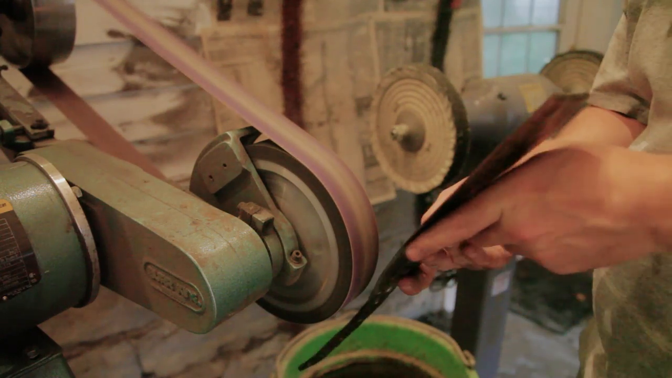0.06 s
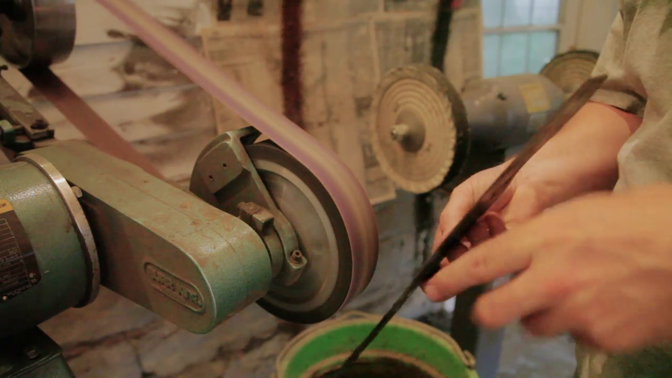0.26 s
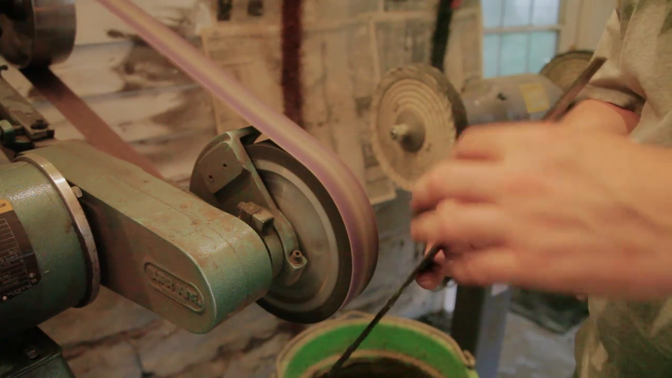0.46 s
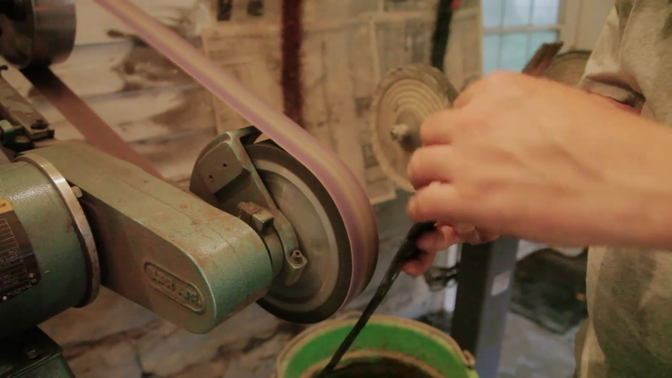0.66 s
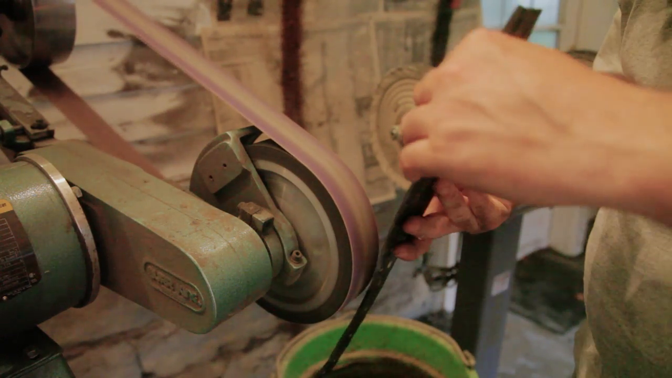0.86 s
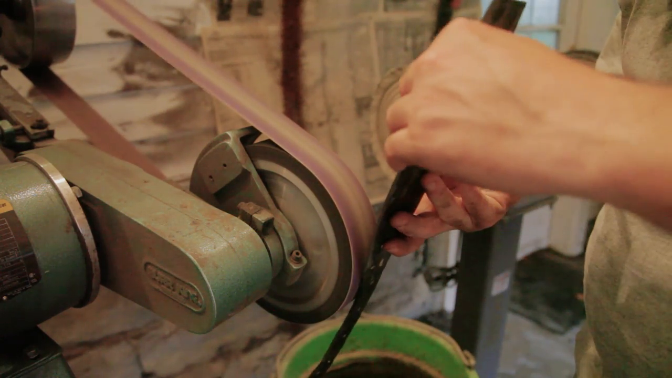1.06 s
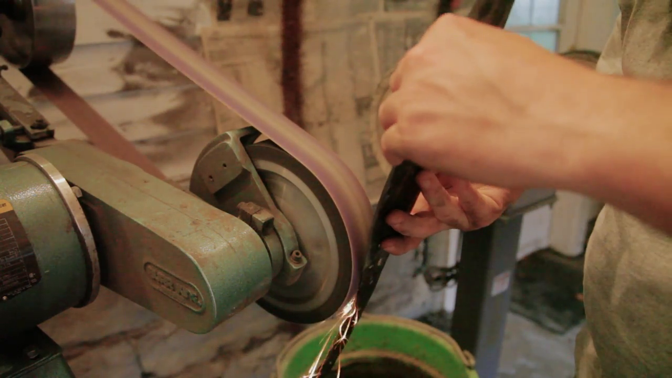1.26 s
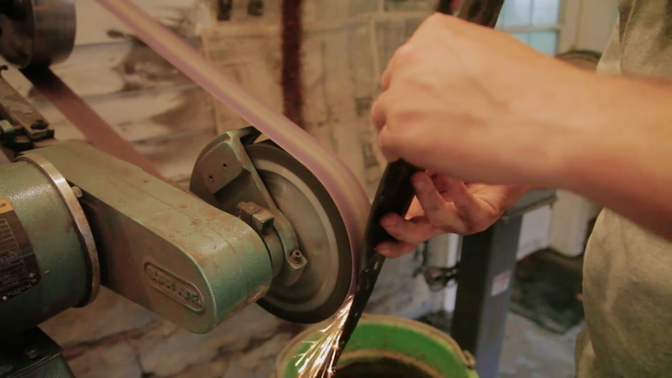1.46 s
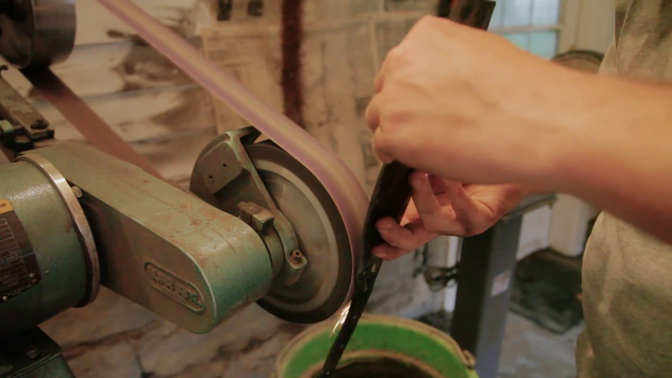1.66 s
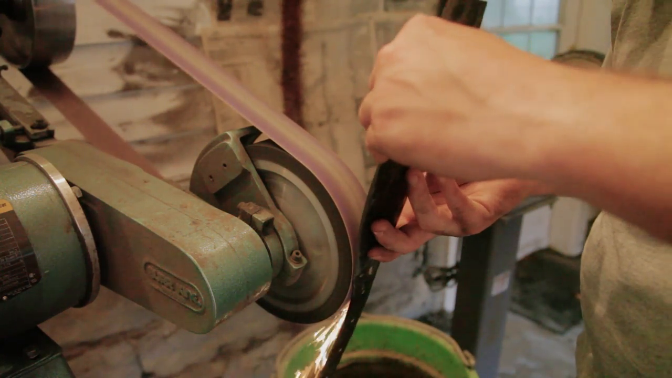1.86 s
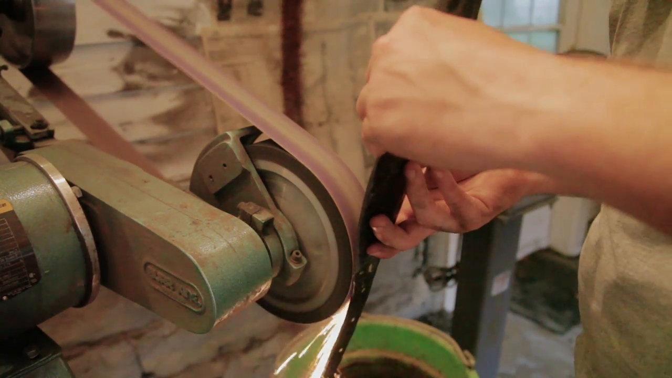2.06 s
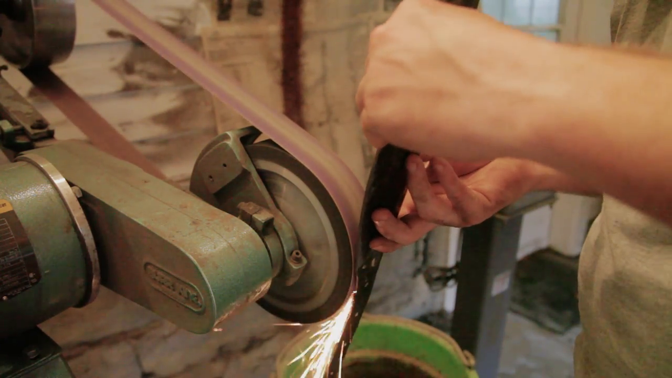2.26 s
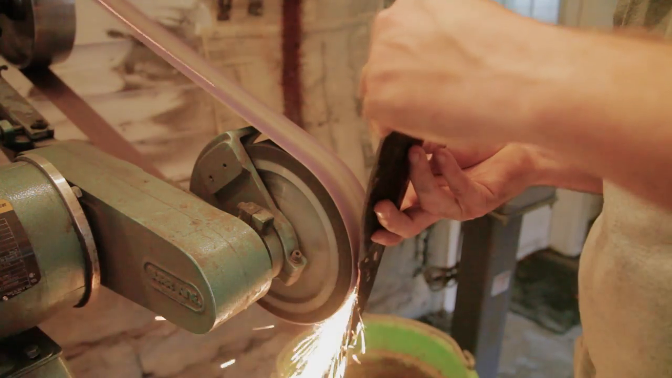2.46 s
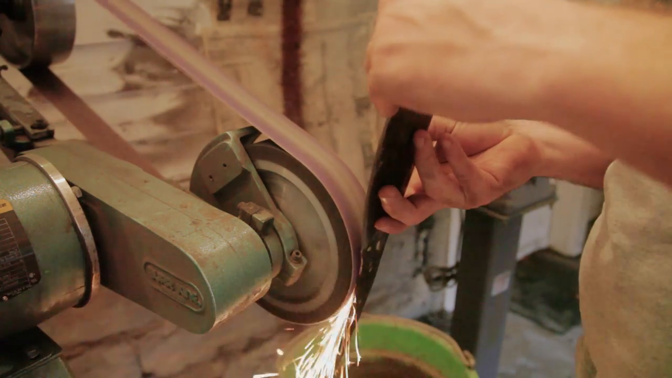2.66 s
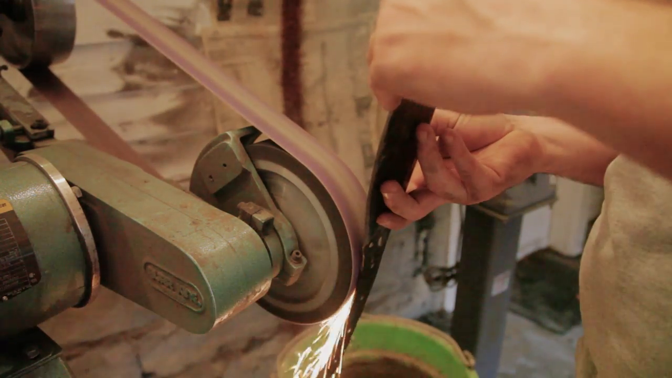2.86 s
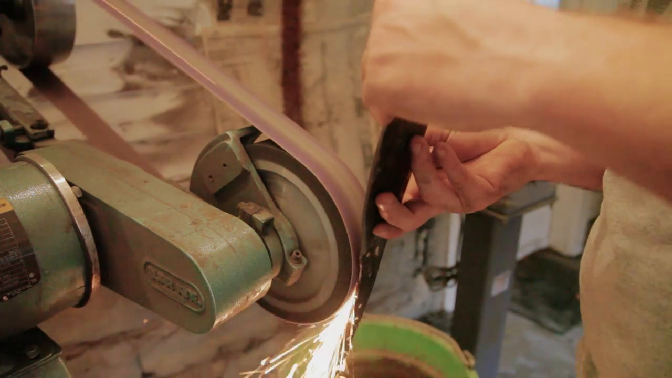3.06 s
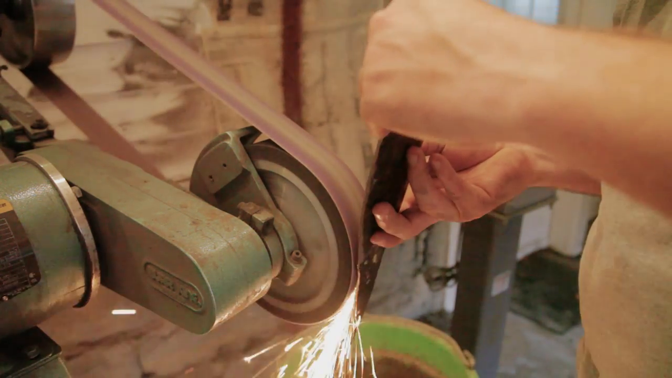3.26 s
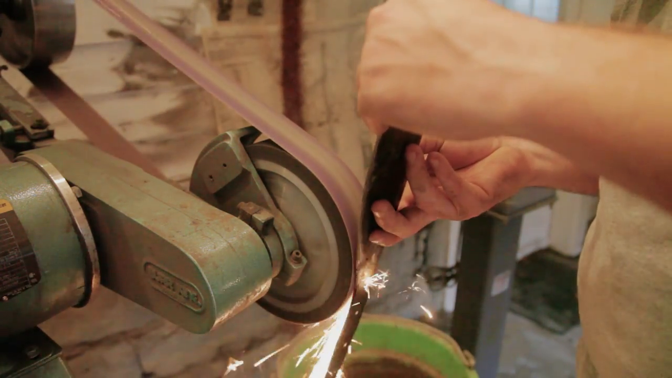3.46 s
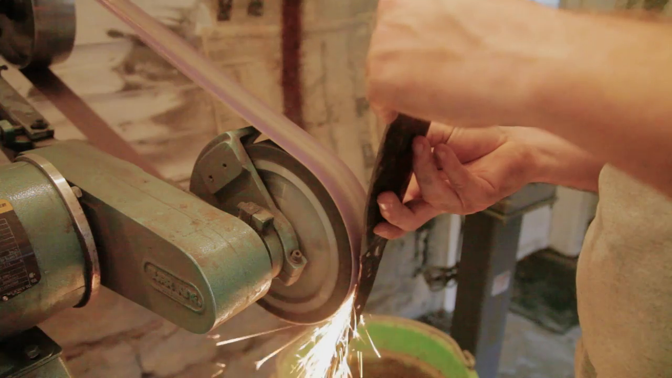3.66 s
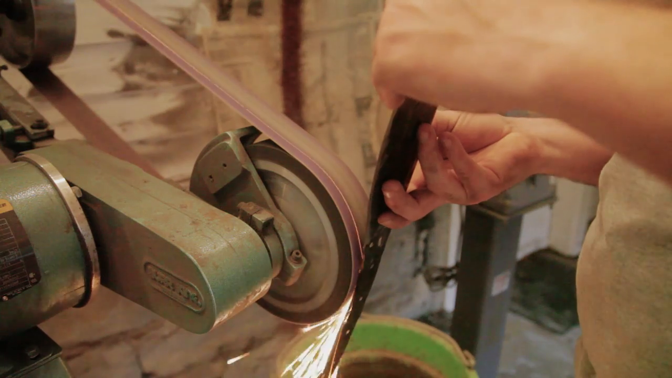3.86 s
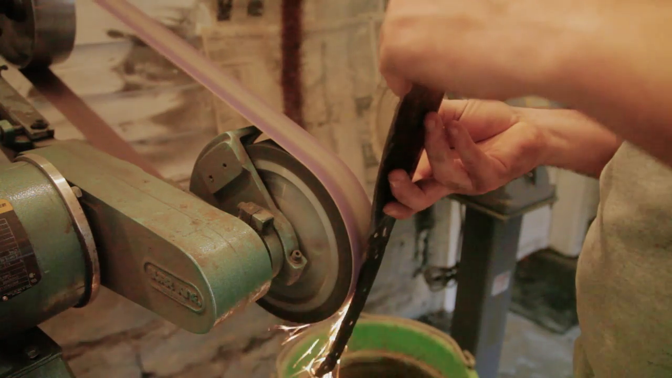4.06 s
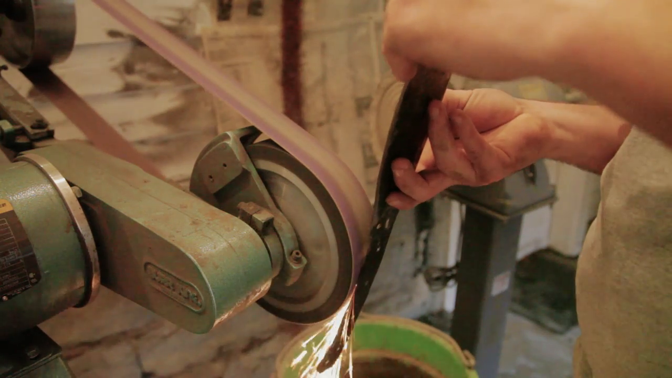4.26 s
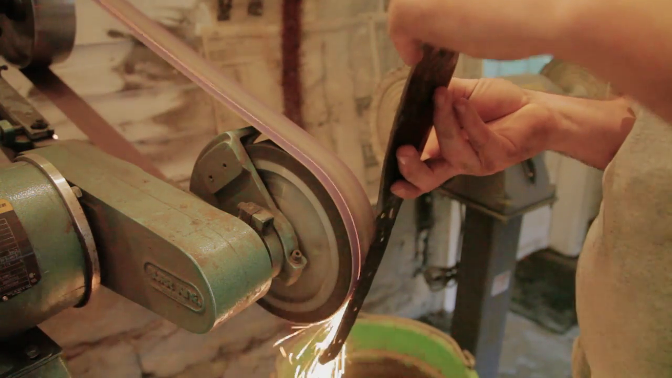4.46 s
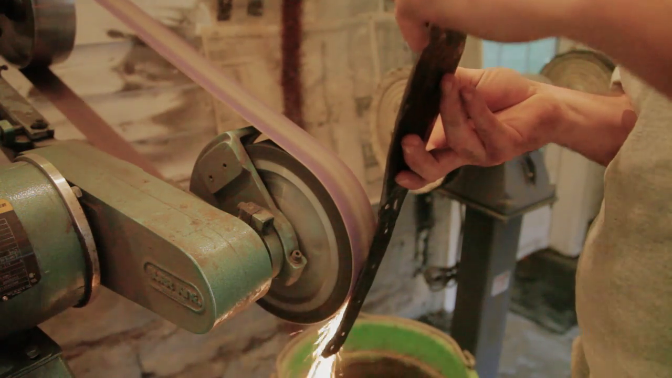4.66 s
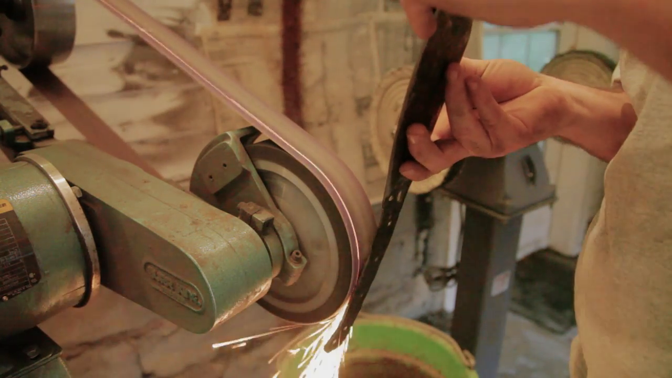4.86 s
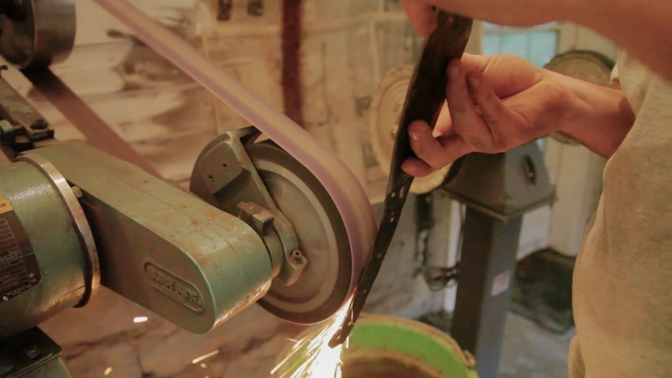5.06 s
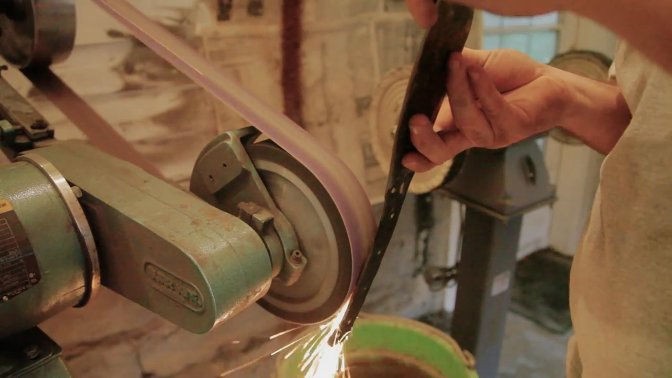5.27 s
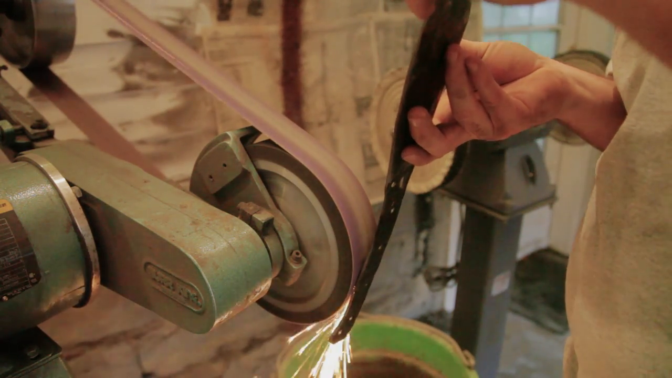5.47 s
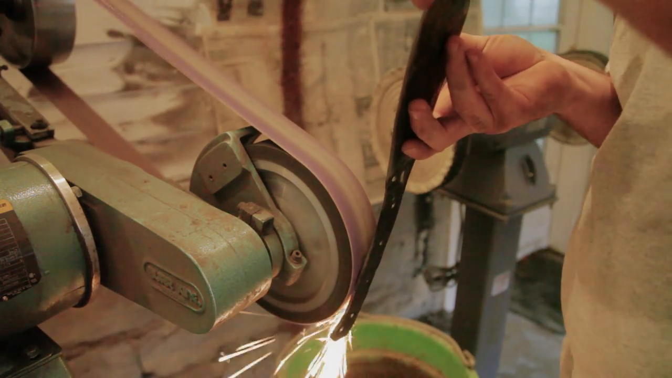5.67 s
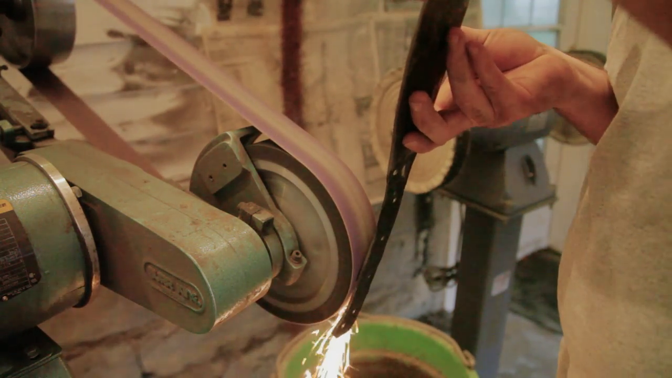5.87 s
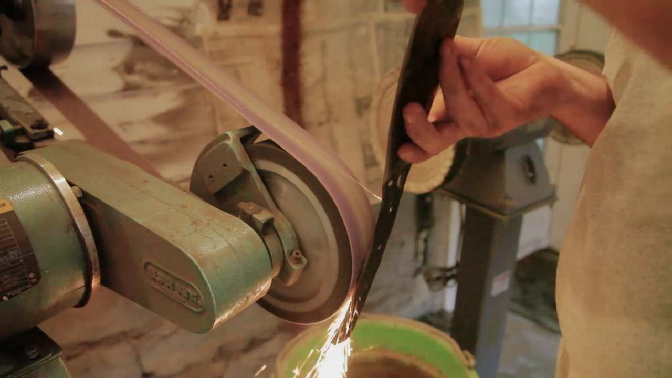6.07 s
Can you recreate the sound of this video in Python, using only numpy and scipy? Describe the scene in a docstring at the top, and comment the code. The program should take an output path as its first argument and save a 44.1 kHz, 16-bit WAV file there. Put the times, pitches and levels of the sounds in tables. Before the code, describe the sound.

A belt grinder runs in a small workshop, its motor humming, its wheel droning and its belt hissing with a fast, even ticking. After about a second a steel blade grazes the belt, chatters briefly and settles into steady grinding. The high scrape carries shifting metallic ringing tones and swells of sizzle, with a coarser rasp whenever the blade is pressed harder. The sound is close, with little echo.

```python
"""In a small workshop, a long steel blade is ground on a running belt grinder.
The blade grazes the belt, lands, bounces ever faster, settles and is drawn along towards its tip.
The grit scrapes the steel, tears off sizzling chips and makes the blade ring with tones that come
and go as the contact point moves; firm presses add a rasp. Behind it the belt hisses, its joint
ticks once a lap, the wheel drones and the motor hums."""
import sys
import numpy as np
from scipy import signal
from scipy.fft import rfft, irfft
from scipy.io import wavfile

SR = 44100
rng = np.random.default_rng(int(sys.argv[2]) if len(sys.argv) > 2 else 0)


def wav_out(sig):
    """Save sig, one row per channel (or a flat mono array), as 16-bit PCM at SR to the path in sys.argv[1]."""
    wavfile.write(sys.argv[1], SR, np.round(np.clip(np.atleast_2d(sig).T, -1, 1) * 32767).astype(np.int16))


N = 270288

# The blade's ways of bending, one tone each. An antinode is a spot that bends most.
# (pitch [Hz], width [Hz], level [dB], swing up and down [dB], lobes along the blade, antinode [0-1])
BLADE_TONES = [(1937, 29, -22.5, 6, 3.54, 0.51), (2036, 29, -20.5, 11.5, 0.75, 0.89),
               (2407, 25, -18, 6.5, 2.6, 0.52), (2575, 22, -19, 4, 1.9, 0.56),
               (2804, 7.4, -24, 4, 4.9, 0.53), (2940, 22, -22.5, 12, 2.15, 0.36),
               (3196, 30, -21, 5.5, 8.1, 0.59), (3544, 21, -14.5, 11.5, 1.36, 0.2),
               (3833, 18, -9, 4.5, 1.02, 0.92), (3918, 92, -16.5, 7, 3.96, 0.64),
               (4164, 27, -12.5, 6, 4.45, 0.53), (4512, 30, -10.5, 4.5, 8.34, 0.535),
               (4676, 35, -13.5, 1, 4.61, 0.6), (5084, 23, -15, 4, 8.6, 0.5),
               (5435, 38, -11.5, 6, 8.02, 0.6), (5830, 13, -13.5, 8.5, 3.57, 0.5),
               (6170, 28, -15.5, 7, 6.9, 0.54), (6563, 110, -11.5, 8, 3.69, 0.5),
               (7050, 67, -20, 12.5, 4.24, 0.65), (7505, 45, -21, 7, 6.0, 0.585),
               (7930, 49.0, -21, 12, 5, 0.54), (8460, 40, -17, 8.5, 12.02, 0.7),
               (8960, 90, -17.5, 6.5, 6, 0.52), (9350, 340, -17, 9.5, 6.2, 0.53),
               (9430, 120, -18, 7.5, 6.9, 0.49), (9900, 87, -24, 12, 5.7, 0.47),
               (10610, 240, -17, 5.8, 5.96, 0.62), (11350, 48.0, -21, 7, 6.5, 0.57),
               (12050, 130, -15.5, 11.5, 3.37, 0.51), (12600, 320, -16, 10, 6.6, 0.54)]
# Where the belt meets the blade, twice to and fro, then tipwards: (time [s], place [0 tip, 1 heel])
CONTACT_PLACE = [(1.3, .665), (1.55, .672), (1.9, .706), (2.18, .692), (2.33, .66), (2.52, .654),
                 (2.7, .596), (2.87, .576), (3.15, .66), (3.52, .68), (3.75, .611), (3.92, .576),
                 (4.13, .572), (4.22, .464), (4.55, .436), (4.65, .317), (5.3, .29), (5.6, .266)]
def blade_ring(push, ring_db):
    """The grit rings each tone of the blade most when the belt meets one of its antinodes."""
    place, = in_time(CONTACT_PLACE)
    settled, = in_time(SETTLED)
    ring = 0
    for hz, width, db, swing_db, lobes, antinode in BLADE_TONES:
        place_db = swing_db * np.cos(2 * np.pi * lobes * (place - antinode))
        knock_db = 4.1 * (1 - settled) * np.log2(4800 / hz)   # bounces favour the low tones
        strength = push * from_db(ring_db + db + place_db + knock_db)
        ring = ring + resonance(strength * grit(spread_db=3), hz, width)
    return from_db(0.04) * ring


# Tone colour of grit scraping the steel: (pitch [Hz], relative level [dB])
SCRAPE_COLOUR = [(3000, -35), (3600, -11), (4300, -11), (5000, -20), (6000, -6), (7200, -4), (8200, -11),
                 (9400, -19), (10400, -34), (12000, -10), (15500, -12.5)]
# Tone colour of chips tearing off: (pitch [Hz], relative level [dB])
SIZZLE_COLOUR = [(8000, -42), (9500, -13), (10300, -4.5), (11400, 0), (12500, -1), (13400, -6),
                 (14400, 1.5), (15700, -5.5)]
def blade(laps):
    """Steel on the moving belt rings, scrapes and sizzles."""
    ring_db, scrape_db, sizzle_db = grinding_levels()
    wobble_db = 0.15 * np.sin(6 * np.pi * laps)   # the slightly uneven wheel turns three times a lap
    flicker_db = 1.02 * drift(35)
    push, bite = contact() * from_db(wobble_db + flicker_db)
    ring = blade_ring(push, ring_db)
    scrape = from_db(scrape_db) * coloured(grit(spread_db=3.5), SCRAPE_COLOUR)
    sizzle = from_db(sizzle_db + 0.9) * coloured(grit(spread_db=6.5), SIZZLE_COLOUR)
    return ring + push * scrape + bite * sizzle


def grit(spread_db):
    """Countless grains bite the steel, each with a strength of its own."""
    return rms_one(rng.standard_normal(N) * from_db(spread_db * rng.standard_normal(N)))


GRAZE_S, LANDING_S, TOUCH_S = 1.177, 1.267, .011   # glancing touch, landing, length of one touch
FIRST_GAP_S, GAP_RATIO = .0328, .966   # each gap between bounces is shorter than the last
# How steadily the blade lies on the belt: (time [s], steady contact [0-1])
SETTLED = [(1.27, 0.6), (1.3, 0.16), (1.52, 0), (1.62, 0.86), (1.7, 1), (1.77, 0.98)]
def contact():
    """Push on the blade and bite of the grit: brief touches that fade as the blade settles."""
    t = np.arange(N) / SR
    settled, = in_time(SETTLED)
    bounces = LANDING_S + np.cumsum(FIRST_GAP_S * GAP_RATIO ** np.arange(16))
    # (time [s], push [dB], bite [dB])
    touches = [(GRAZE_S, 11, 26), (LANDING_S, 11, 12)] + [(s, 6, 12) for s in bounces]
    force = settled * (t > LANDING_S)
    for start, push_db, bite_db in touches:
        age = np.clip((t - start) / TOUCH_S, 0, 10)
        pulse = (1 - np.exp(-10 * age)) * np.exp(-age ** 2)
        force = force + (1 - settled) * from_db([[push_db], [bite_db]]) * pulse
    return force


# Base levels of light grinding: (time [s], ring [dB], scrape [dB], sizzle [dB])
LIGHT_GRINDING = [(1.3, -21.5, -38, -41.5), (1.54, -23.5, -37, -36), (1.7, -24, -32, -29),
                  (2.5, -23.5, -32, -31), (2.86, -24.5, -38, -30.5), (3.0, -24, -30, -31.5),
                  (3.45, -27, -28.5, -29), (3.85, -24.5, -31.5, -31.5), (4.15, -27, -34, -30.5),
                  (4.42, -23, -41, -31.5), (4.56, -28.5, -40, -34), (4.72, -28.5, -43, -37),
                  (4.9, -24.5, -48, -34), (5.42, -26.5, -48, -34.5), (5.65, -26, -50, -30.5),
                  (6.13, -27.5, -51, -31)]
# The hands press harder and the edge digs in: (start [s], end [s], extra ring [dB], rasp [dB])
HAND_PRESSES = [(1.407, 1.624, 3.5, -33), (2.24, 2.726, 3.5, -32), (2.93, 3.285, 4, -30),
                (3.275, 3.857, 1.5, -30), (4.44, 4.508, 4, -32), (5.02, 5.3, 1.5, -38),
                (5.61, 6.203, 2.5, -49)]
# Showers of sparks swell and fade: (peak time [s], half length [s], extra sizzle [dB])
SPARK_SHOWERS = [(1.682, 0.12, 6.5), (2.123, .13, 7.5), (2.585, .04, 8.5), (3.05, .09, 6),
                 (3.547, .09, 4.5), (4.055, 0.098, 8), (4.48, .05, 6.5)]
def grinding_levels():
    """Presses make the ring and scrape louder; showers of sparks lift the sizzle."""
    t = np.arange(N) / SR
    ring_db, scrape_db, sizzle_db = in_time(LIGHT_GRINDING)
    press_db = sum(db * press(start, end) for start, end, db, _ in HAND_PRESSES)
    spark_db = sum(db * np.exp(-((t - s) / half_s) ** 2) for s, half_s, db in SPARK_SHOWERS)
    return ring_db + press_db, scrape_db + 0.81 * press_db, sizzle_db + spark_db


def press(start, end, attack_s=.016, release_s=.03):
    """One press bites in quickly, holds and lets go, on a scale of 0 to 1."""
    t = np.arange(N) / SR
    return np.clip(np.minimum((t - start) / attack_s, (end - t) / release_s) + .5, 0, 1)


# Broad tones of the blade held hard against the wheel: (pitch [Hz], width [Hz], level [dB])
RASP_BANDS = [(3920, 290, -4.5), (4400, 250, -2.5)]
def rasp():
    """Firm presses add a coarse rasp: the blurred ringing of steel damped by the wheel."""
    grip = sum(from_db(db) * press(start, end) for start, end, _, db in HAND_PRESSES)
    coarse = 0
    for hz, width, db in RASP_BANDS:
        band = resonance(grit(spread_db=4.5), hz, width)
        coarse = coarse + from_db(db) * rms_one(resonance(band, hz, width * 2))
    push, _ = contact()
    return grip * push * coarse


# Tone colour of the running belt: (pitch [Hz], relative level [dB])
BELT_COLOUR = [(240, -31), (400, -15.5), (519, -16.5), (560, -9), (860, -13.5), (1190, -5), (1960, -14),
               (2470, -6), (3210, -6), (3510, -1.5), (5000, 0.5), (7210, -7.5), (8930, -6), (9790, -14.5),
               (15500, -23.5)]
# Faint whine of the pulleys: (pitch [Hz], relative level [dB])
PULLEY_WHINE = [(565, -19.5), (737.5, -23), (995.9, -17), (1179, -14), (1497, -15.5)]
# Volume of the belt and pulleys, lower during grinding: (time [s], gain [dB])
BELT_VOLUME = [(0, -32.5), (.35, -31.5), (1.12, -33), (1.23, -36), (1.42, -36.5), (1.62, -39.5), (2.0, -37),
               (2.3, -38.5), (2.47, -36.5), (2.63, -40.5), (2.84, -35.5), (3.18, -39.5), (4.05, -38),
               (4.13, -40), (4.33, -38), (4.55, -39.5), (5.05, -37.5), (6.13, -35)]
def belt(laps):
    """The belt rushes and ticks over whining pulleys, and hisses less once the blade lies on it."""
    volume_db, = in_time(BELT_VOLUME)
    settled, = in_time(SETTLED)
    rush = from_db(12.5) * coloured(belt_surface(laps, repeat_share=0.52), BELT_COLOUR)
    running = rush + from_db(31.5) * joint_ticks(laps)
    hiss = signal.sosfiltfilt(signal.butter(2, 2100, "high", fs=SR, output="sos"), running)
    running = running + hiss * (from_db(-3 * settled) - 1)
    return from_db(volume_db) * (running + tones(PULLEY_WHINE, waver=2.44))


def joint_ticks(laps, rattle_s=0.0013, rattle_db=-16):
    """Once a lap the belt's joint slaps the wheel: a sharp click and a short rattle."""
    clicks = np.diff(np.floor(laps), prepend=-1) * from_db(1.3 * rng.standard_normal(N))
    t = np.arange(SR // 50) / SR
    slap = from_db(rattle_db) * rng.standard_normal(len(t)) * np.exp(-t / rattle_s)
    slap[0] = 1
    slaps = signal.fftconvolve(clicks, slap)[:N]
    return resonance(resonance(slaps, hz=5200, width=5000), hz=6000, width=5500)


# The belt slows a little under load: (time [s], speed [laps per second])
BELT_SPEED = [(0, 11.56), (1.25, 11.56), (2.5, 11.44), (4.2, 11.46), (4.8, 11.51), (6.13, 11.54)]
def belt_laps(first_tick_s=.0074):
    """Count the laps the belt has run; its speed wavers very slightly."""
    speed, = in_time(BELT_SPEED)
    return np.cumsum(speed * (1 + .0005 * drift(5))) / SR - first_tick_s * speed[0]


def belt_surface(laps, repeat_share):
    """The same grit comes round every lap, mixed with fresh noise."""
    one_lap = rng.standard_normal(round(SR / BELT_SPEED[0][1]))
    repeating = one_lap[(laps % 1 * len(one_lap)).astype(int) % len(one_lap)]
    return np.sqrt(repeat_share) * repeating + np.sqrt(1 - repeat_share) * rng.standard_normal(N)


# The wheel's own tones: (pitch [Hz], relative level [dB])
WHEEL_TONES = [(345.5, -12.5), (355.3, -4)]
# Ringing of the wheel's housing: (pitch [Hz], width [Hz], relative level [dB])
HOUSING_BANDS = [(301.4, 39, -12.5), (340.4, 22, -4)]
# Volume of the drone: (time [s], level [dB])
DRONE_VOLUME = [(0, -29), (1.3, -32.5), (1.7, -38), (2.6, -40), (2.95, -36.5), (3.3, -40), (4.7, -41),
                (5.15, -38), (6.13, -36.5)]
def wheel():
    """The housing's ringing beats against the wheel's own tones, so the drone throbs."""
    volume_db, = in_time(DRONE_VOLUME)
    housing = 0
    for hz, width, db in HOUSING_BANDS:
        band = resonance(rng.standard_normal(N), hz, width)
        housing = housing + from_db(db) * rms_one(resonance(band, hz, width))
    return from_db(volume_db) * rms_one(housing + tones(WHEEL_TONES, waver=0.65))


# Steady tones of the motor and pulleys: (pitch [Hz], relative level [dB])
MOTOR_TONES = [(23.1, -21), (33.6, -17), (46.5, -22), (107.7, -8.5), (164.2, -11.5), (177.3, -8),
               (187.4, -12), (209.9, -3)]
# Tone colour of the rumbling frame: (pitch [Hz], relative level [dB])
FRAME_COLOUR = [(15, -17), (30, -11), (70, -7.5), (110, -5), (170, -1.5), (250, -2), (420, 0), (600, -14.5),
                (1200, -49)]
# Volume of the hum and rumble: (time [s], gain [dB])
MOTOR_VOLUME = [(0, -37.5), (.75, -37), (1.5, -46), (2.05, -43.5), (2.62, -49), (2.85, -47), (4.65, -49),
                (5.1, -44.5), (6.13, -45.5)]
def motor(laps):
    """The motor hums and the frame rumbles as the belt goes round."""
    volume_db, = in_time(MOTOR_VOLUME)
    hum = tones(MOTOR_TONES, waver=0.51)
    rumble = from_db(-2) * coloured(belt_surface(laps, repeat_share=0.36), FRAME_COLOUR)
    return from_db(volume_db) * (hum + rumble)


def workshop(x, fade_s=.2, echo_db=-12.5):
    """The near walls add a short wash of echoes that falls 60 dB in fade_s."""
    t = np.arange(SR // 2) / SR
    tail = rng.standard_normal(len(t)) * from_db(-60 * t / fade_s) * (t > .004)
    return x + from_db(echo_db) * signal.fftconvolve(x, tail / np.linalg.norm(tail))[:N]


def from_db(db):
    """Turn decibels into a volume factor."""
    return 10 ** (np.asarray(db) / 20)


def rms_one(x):
    """Scale a signal to an average strength (rms) of 1."""
    return x / np.sqrt(np.mean(x ** 2) + 1e-20)


def in_time(rows):
    """Join a table's points with straight lines: one curve for each column after time."""
    times, *columns = np.transpose(rows)
    return [np.interp(np.arange(N) / SR, times, column) for column in columns]


def coloured(x, colour):
    """Give noise a tone colour, falling 20 dB an octave past the table's ends; strength 1."""
    hz, db = np.transpose(colour)
    octave, listed = np.log2(np.fft.rfftfreq(N, 1 / SR) + 1), np.log2(hz)
    outside = np.abs(octave - np.clip(octave, listed[0], listed[-1]))
    gain = from_db(np.interp(octave, listed, db) - 20 * outside)
    return rms_one(irfft(rfft(x) * gain, N))


def drift(rate):
    """A random wander with about rate changes a second; strength 1."""
    hz = np.fft.rfftfreq(N, 1 / SR)
    return rms_one(irfft(rfft(rng.standard_normal(N)) / (1 + (hz / rate) ** 2), N))


def resonance(x, hz, width):
    """Make a signal ring at one pitch; a smaller width rings longer."""
    r = np.exp(-np.pi * width / SR)
    feed = np.sqrt((1 - r * r) / 2) * np.array([1, 0, -1])
    feedback = [1, -2 * r * np.cos(2 * np.pi * hz / SR), r * r]
    return signal.lfilter(feed, feedback, x + 1e-18)


def tones(rows, waver):
    """Pure tones whose phase wanders by about waver radians."""
    t = np.arange(N) / SR
    return sum(np.sqrt(2) * from_db(db) * np.sin(2 * np.pi * (hz * t + rng.random()) + waver * drift(.99))
               for hz, db in rows)


def scene():
    """The grinder, and the blade with its echoes, alike in both channels."""
    laps = belt_laps()
    grinder = belt(laps) + wheel() + motor(laps)
    sound = grinder + workshop(blade(laps) + rasp())
    return np.array([sound, sound])


def record(dry, cutoff_hz=15700):
    """Cut off the very highest treble steeply."""
    return signal.sosfilt(signal.ellip(12, .1, 90, cutoff_hz, fs=SR, output="sos"), dry)


dry = scene()
out = record(dry)
wav_out(out)
```